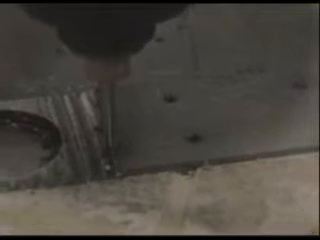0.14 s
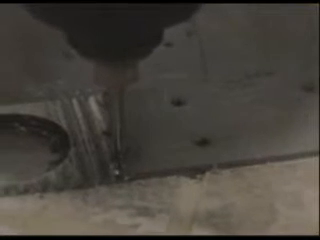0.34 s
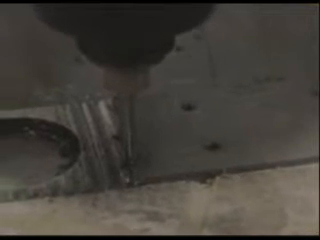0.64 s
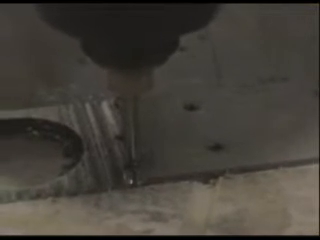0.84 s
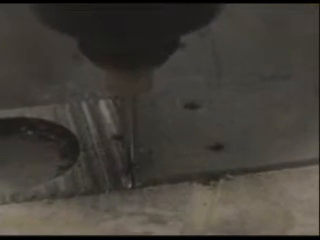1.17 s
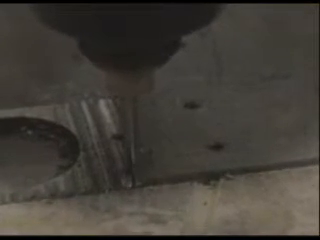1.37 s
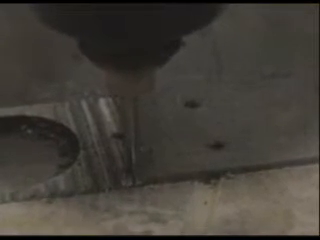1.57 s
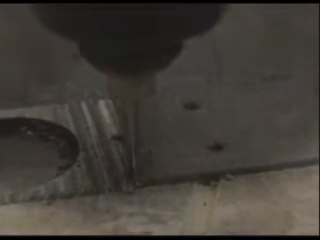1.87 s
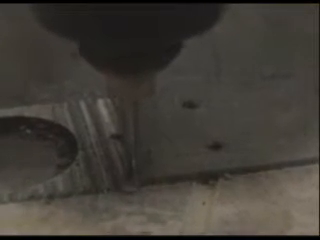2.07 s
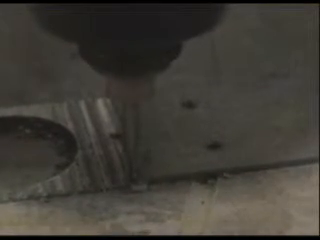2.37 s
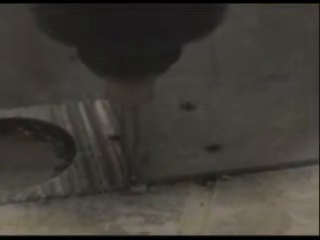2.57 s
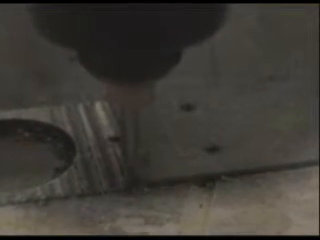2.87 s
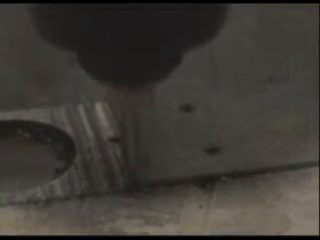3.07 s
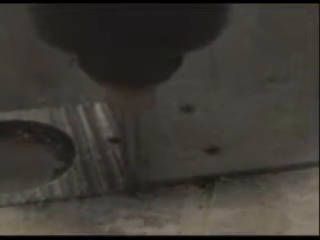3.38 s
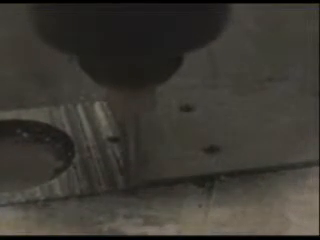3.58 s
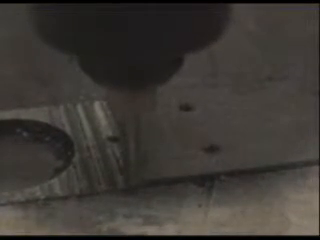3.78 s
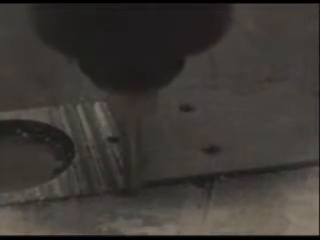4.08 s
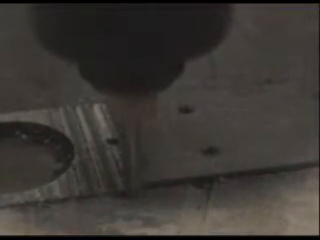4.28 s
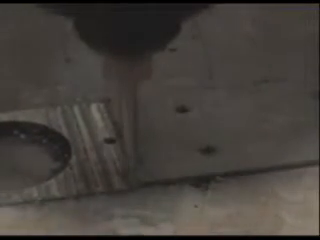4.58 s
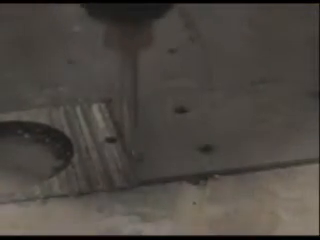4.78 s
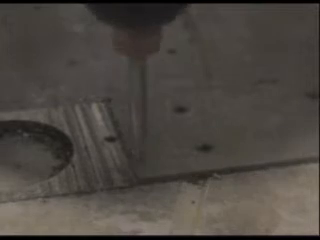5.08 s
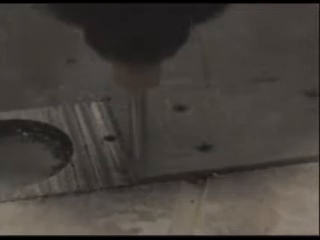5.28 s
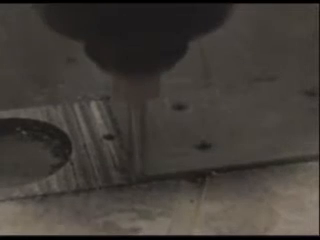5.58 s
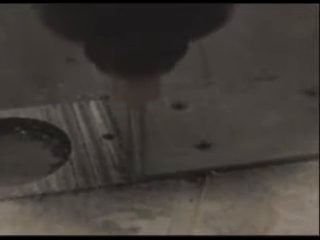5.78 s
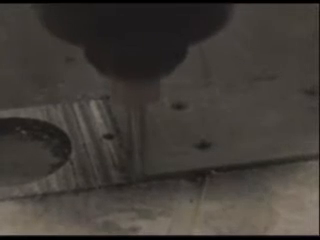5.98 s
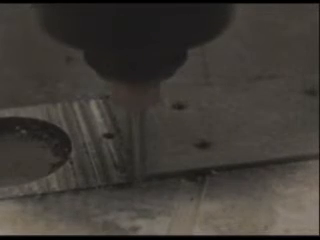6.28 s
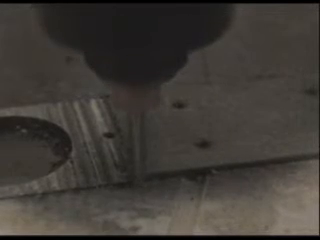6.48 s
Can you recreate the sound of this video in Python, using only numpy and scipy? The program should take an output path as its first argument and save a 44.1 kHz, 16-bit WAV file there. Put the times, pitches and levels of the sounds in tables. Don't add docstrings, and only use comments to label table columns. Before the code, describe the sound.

Harsh milling of steel plate, gritty and ringing, lifts away with knocks and a squeaky chatter, leaving a steady spindle whine and brief axis moves.

```python
import sys
import numpy as np
from scipy import signal
from scipy.fft import rfft, irfft, next_fast_len
from scipy.io import wavfile
from scipy.ndimage import uniform_filter1d

SR = 44100
rng = np.random.default_rng(int(sys.argv[2]) if len(sys.argv) > 2 else 0)


def boost_factor(decibels):
    exponent = np.asarray(decibels, float) / 20
    return 10 ** exponent


def pcm_store(signal):
    levels = np.round(np.clip(np.atleast_2d(signal), -1, 1) * 32767)
    wavfile.write(sys.argv[1], SR, levels.astype(np.int16).T)


N = 292824

# t/s, f/Hz
SHAFT_SPEED = [
    (0, 213.6),
    (.3, 213.2),
    (1.3, 213.45),
    (2.1, 213.1),
    (2.7, 213.4),
    (2.8, 215),
    (3.3, 214.8),
    (3.4, 214.5),
]
# shaft multiple, level/dB
BITE_ORDERS = [(2, -1.5), (3, -18.5), (4, -1), (5, -13.5), (6, 2), (7, -17), (8, -7.5), (9, -13.5), (10, 0),
               (11, -10), (12, -3), (13, -7.5), (14, -15.5), (15, -7.5), (16, -8), (17, -13), (18, -7),
               (19, -21.5), (20, -8)]
# shaft multiple, level/dB
RUB_ORDERS = [(1, -17), (2, -21), (3, -13), (4, -8), (5, -5.5), (6, 0), (7, -13.5), (8, -4.5), (9, -9),
              (10, -14), (11, -13.5), (12, -11), (13, -8), (14, -30), (15, -15)]
BARS_DB = [-18, -19, -7.5, -3.5, -2, -6.5, -14]
# f/Hz, density/dB
FAN_AIR = [(53, -72), (90, -23.5), (209, -18.5), (267, -14), (497, -12.5), (646, -10), (941, -11.5),
           (1110, -6), (1340, -9.5), (2230, -9), (2740, -6.5), (3440, -5), (4150, -3.5), (6270, -7.5),
           (8000, -15.5), (10400, -40.5), (17600, -120)]
# f/Hz, width/Hz, level/dB
HOUSING = [(651, 35, 4.5), (1147, 160, 7), (3040, 310, 1.5), (4106, 170, -2), (4990, 170, -3.5),
           (6420, 200, -5.5)]
# f/Hz, density/dB
TEAR = [(250, -35.5), (480, -29), (570, -1.5), (680, -9.5), (900, -29.5), (1100, -8.5), (1250, 0),
        (1450, -9.5), (2500, -3), (4000, -9), (5600, -9.5), (8000, -10), (10000, -54)]
# f/Hz, width/Hz, level/dB
TOOL_IN = [(4470, 40, -10), (4680, 28, 0), (4890, 30, -7), (5088, 45, -2), (5310, 40, -13), (5510, 45, -10),
           (5720, 60, -13)]
# f/Hz, width/Hz, level/dB
TOOL_OUT = [(4510, 30, -10), (4715, 28, -1), (4935, 20, 2), (5150, 24, -1), (5580, 30, -12)]
# t/s, level/dB
JOLTS = [
    (4.385, -28),
    (5.045, -27),
    (5.263, -24.5),
]
# f/Hz, left minus right/dB
CUT_SIDE = [(60, 0.5), (88, 13), (130, 4.5), (190, -1), (270, -1.5), (400, -4), (590, 8), (860, 2),
            (1260, 7), (1840, 8), (2690, 2.5), (3940, 7), (5760, 4), (8430, -1)]
# f/Hz, left minus right/dB
FAN_SIDE = [(60, 9), (94, -8), (150, 8.5), (230, 2), (360, 5.5), (570, 6.5), (890, 2.5), (1400, 4.5),
            (2190, 3.5), (3430, 5.5), (5380, 3), (8430, 3)]
# f/Hz, level/dB
SCATTER = [(100, -1.5), (250, -7.5), (500, -9.5), (1000, -14), (2000, -25.5), (4200, -14.5), (7800, -9),
           (8500, -21)]
# f/Hz, level/dB
ROLL_OFF = [(100, -12.5), (140, -2.5), (200, 1), (7600, 1), (8000, -3.5), (8370, -10), (8700, -20.5),
            (9000, -50)]
# t/s, level/dB
DEPTH = [(0, -31), (.14, -29.5), (.69, -29), (.9, -30), (1.35, -29), (1.7, -31), (2.2, -30.5),
         (2.64, -28.5), (2.75, -31)]
# t/s, ring level/dB, half length/s
GRABS = [(.065, 1, 0.024), (.12, 1, 0.022), (.17, -2, 0.01), (.29, -2.5, .02), (.41, -1, 0.017),
         (.92, -2.5, 0.043), (1.38, 1.5, 0.054), (1.53, 1.5, .035), (1.62, -3, 0.033), (1.84, 1.5, 0.034),
         (1.965, -7.5, 0.019), (2.03, 3.5, .02), (2.36, 1.5, .015), (2.39, -6, 0.0082), (2.425, 4.5, 0.012),
         (2.54, 0.5, 0.02), (2.58, -10, 0.016), (2.67, -0.5, .03), (2.73, -6, 0.018), (2.79, 3, .015)]
# t/s, level/dB, t60/s
KNOCKS = [
    (2.825, -25, 1.5),
    (3.13, -28.5, 1.5),
    (3.349, -29, .15),
]
# t/s, level/dB, half length/s
SNAGS = [
    (2.855, 0, 0.015),
    (2.97, 1.5, 0.016),
    (3.1, 0.5, .02),
    (3.2, -3.5, 0.01),
    (3.29, -1.5, 0.023),
    (3.35, 8.5, 0.013),
    (3.488, 10, 0.012),
]
# t/s, level/dB
GAIN = [(0, -4.5), (.7, -4.5), (1.7, -6), (2.75, -3.5), (2.9, -7.5), (3.16, -1.5), (3.29, -4.5), (3.7, 0),
        (4.3, 1), (4.45, 0.5), (4.84, 0.8), (4.92, -1), (5.03, 1.5), (5.08, -2.5), (5.22, -0.2),
        (5.34, -0.5), (5.66, 0), (6.64, -0.1)]
# t/s, level/dB, half length/s
THRUM_LIFT = [
    (2.952, 5, 0.34),
]
# t/s, half length/s, f/Hz, level/dB, overtone level/dB
NUDGES = [
    (4.4, 0.05, 162, -46.5, -40),
    (4.636, 0.041, 217, -62.5, -38),
    (4.75, 0.05, 153.6, -53, -47),
    (4.862, .04, 172, -49, -39),
]
# t/s, f/Hz, level/dB, half length/s
SQUEAK = (2.857, 4700, -25, .024)

IDLE_HZ, FEED_HZ = 214.5, 15
LIFT_S, BITE_FADE_DB_S, DULL_DB_S = 2.753, 124, 69
TEAR_DB, RING_DB = -2, 3.5
TEAR_FOLLOWS, BITE_FOLLOWS = 0.66, 0.3
RUB_FROM_S, RUB_TO_S, RUB_DB, RUB_RISE_DB_S, RUB_FALL_DB_S = 2.946, 3.235, -33.5, 60.5, 46
KNOCK_ORDER = 5
CHATTER_S, CHATTER_DB, CHATTER_FADE_DB_S = 2.83, -25.5, 11.5
FREE_S, FREE_DB_S, CUT_ENDS_S = 3.4, 158, 3.8
SING_DB, WANDER = -4, .5
FAN_DB, WHINE_DB, BLADE_DB, THRUM_DB = -33.5, -25.5, -38.5, -46.5
LOAD_WHINE_DB, LOAD_BLADE_DB = -0.5, -6
PLUNGE_S, PLUNGE_HZ, PLUNGE_DB, RAMP_HZ_S, RAMP_DB_S = 5.185, 249, -38.5, 768, 69


def unit(x):
    return x / np.sqrt(np.mean(x ** 2) + 1e-20)


def along(points, hz):
    f, v = np.transpose(points)
    return np.interp(np.log(hz + 1), np.log(f + 1), v)


def curves(rows, off=None):
    s, *cols = np.transpose(rows)
    return [np.interp(np.arange(N) / SR, s, c, right=off) for c in cols]


def wobble(rate, count=N):
    knots = rng.standard_normal(int(N * 400 / SR) + 4)
    return np.interp(np.arange(count) * rate / SR, np.arange(len(knots)), knots)


def after(s):
    return np.maximum(np.arange(N) / SR - s, 0)


def before(s):
    return np.maximum(s - np.arange(N) / SR, 0)


def bumps(rows):
    t = np.arange(0, N + 64, 64) / SR
    swells = sum(height * np.exp(-((t - s) / half) ** 2) for s, height, half in rows)
    return np.interp(np.arange(N) / SR, t, swells)


def filtered(x, response):
    m = next_fast_len(N + 8192)
    return irfft(rfft(x, m) * response(np.fft.rfftfreq(m, 1 / SR)), m)[..., :N]


def modes(table):
    def response(f):
        return sum((-1) ** k * boost_factor(db) * 1j * f * w / (c * c - f * f + 1j * f * w)
                   for k, (c, w, db) in enumerate(table))
    return response


def shaft():
    hz = curves(SHAFT_SPEED, off=IDLE_HZ)[0]
    return 2 * np.pi * np.cumsum(hz + 0.1178 * wobble(12)) / SR


def effort():
    depth_db, grab_db = curves(DEPTH)[0], bumps(GRABS)
    bite_db = depth_db + BITE_FOLLOWS * grab_db - BITE_FADE_DB_S * after(LIFT_S)
    bright_db = -.5 - DULL_DB_S * after(LIFT_S - .08)
    gone_db = depth_db - 800 * after(CHATTER_S)
    free_db = FREE_DB_S * after(FREE_S)
    rub_db = RUB_DB - RUB_RISE_DB_S * before(RUB_FROM_S) - RUB_FALL_DB_S * after(RUB_TO_S)
    rub_db = rub_db - free_db - 300 * before(LIFT_S - .06)
    knock_db = np.max([db - 60 * after(s) / t60 - 400 * before(s) for s, db, t60 in KNOCKS], axis=0) - free_db
    chatter_db = CHATTER_DB - CHATTER_FADE_DB_S * after(CHATTER_S) - 150 * before(CHATTER_S)
    chatter_db = chatter_db + bumps(SNAGS) - 200 * after(FREE_S + 0.13)
    tear_db = np.maximum(gone_db + TEAR_DB + TEAR_FOLLOWS * grab_db, chatter_db - 9)
    ring_db = gone_db + RING_DB + grab_db
    return bite_db, bright_db, rub_db, knock_db, tear_db, ring_db, chatter_db


def orders(table, angle, sway_db, gain):
    n, one = round(CUT_ENDS_S * SR), np.ones(N)
    x = 0
    for k, db in table:
        level = (gain(k) * one)[:n] * boost_factor(db + sway_db * wobble(22.06, count=n))
        x = x + level * np.sin(k * angle[:n] + 2 * np.pi * rng.random())
    return np.pad(x, (0, N - n))


def bite_tones(angle, bite_db, bright_db):
    feed = 2 * np.pi * np.cumsum(FEED_HZ + 0.33 * wobble(2.4)) / SR
    throb = 1 + .33 * np.cos(feed) + .17 * np.cos(2 * feed + 1) + .17 * np.cos(4 * feed + 2)

    def gain(k):
        return throb if k == 6 else boost_factor(bright_db) if k > 9 else 1
    tones = boost_factor(bite_db + 3.5) * orders(BITE_ORDERS, angle, sway_db=1.4, gain=gain)
    return tones * (1 + 0.068 * np.cos(4 * feed))


def strikes(gate, steady):
    return gate * (steady + rng.standard_normal(N)) * boost_factor(0.37 * wobble(120))


def chips(gate, tear_db):
    return boost_factor(tear_db + 4.0) * unit(filtered(strikes(gate, .0), lambda f: boost_factor(along(TEAR, f))))


def sing(table):
    n = round(CUT_ENDS_S * SR)
    drift = 2 * np.pi * np.cumsum(WANDER * wobble(45, count=n)) / SR
    t = np.arange(n) / SR
    x = sum(boost_factor(db + 1.8 * wobble(45, count=n)) * np.sin(2 * np.pi * hz * t + width * drift)
            for hz, width, db in table)
    return np.pad(unit(x), (0, N - n))


def tool_ring(contact, level_db, table, sing_db):
    return boost_factor(level_db) * (unit(filtered(contact, modes(table))) + boost_factor(sing_db) * sing(table))


def shank_hash(contact, ring_db, chatter_db):
    return boost_factor(np.maximum(ring_db, chatter_db) - 8) * unit(filtered(contact, modes([(4970, 360, 0)])))


def fan_air(gain_db):
    z = signal.stft(rng.standard_normal(N), nperseg=512)[2]
    patches = uniform_filter1d(uniform_filter1d(rng.standard_normal(z.shape), 6, 0), 8, 1)
    air = signal.istft(z * boost_factor(0.64 * unit(patches)), nperseg=512)[1][:N]

    def housing(f):
        return boost_factor(along(FAN_AIR, f)) * (1 + sum(np.abs(modes([m])(f)) for m in HOUSING))
    return boost_factor(FAN_DB + gain_db + 13 + 0.23 * wobble(25)) * unit(filtered(air, housing))


def commutator_whine(angle, gain_db, load):
    bars_db = WHINE_DB + 1.18 * gain_db + load * (LOAD_WHINE_DB + 1.6 * wobble(12))
    bars_db = bars_db + 0.54 * wobble(8.7) + 1.4 * wobble(32)
    mains = 2 * np.pi * 120 * np.arange(N) / SR
    slip = 12 * angle + 0.12 * wobble(30)
    bars = sum(boost_factor(db + 0.24 * wobble(30)) * np.sin(slip + (k - 2) * mains) for k, db in enumerate(BARS_DB))
    upper = boost_factor(-13.0 + 2.5 * wobble(22)) * np.sin(24 * angle + 2 * mains - angle / 7.9)
    return boost_factor(bars_db) * (bars + upper)


def blade_tone(angle, gain_db, load):
    blade_db = BLADE_DB + 1.6 * gain_db + load * (LOAD_BLADE_DB + 3 * wobble(12))
    jerk = 1.3 * wobble(70) * (np.arange(N) / SR < 2.73)
    return boost_factor(blade_db + 3.5 + 0.59 * wobble(30)) * np.sin(39 * angle + jerk)


def shaft_thrum(angle):
    thrum_db = THRUM_DB + bumps(THRUM_LIFT) + 0.5 * after(FREE_S)
    return boost_factor(thrum_db + 1.1 * wobble(18)) * np.sin(angle + np.array([[.45], [-.45]]))


def rub_tones(angle, rub_db):
    return boost_factor(rub_db + 9.0) * orders(RUB_ORDERS[1:], angle, sway_db=2.5, gain=lambda k: k != KNOCK_ORDER)


def edge_knocks(angle, knock_db):
    return boost_factor(knock_db + 3.0) * np.sin(KNOCK_ORDER * angle)


def tip_squeak():
    s, hz, db, half = SQUEAK
    t = np.arange(N) / SR - s
    swell = boost_factor(db + 1.5 * wobble(80)) * np.exp(-(t / half) ** 4)
    return swell * np.sin(2 * np.pi * hz * t + .4 * wobble(120))


def carriage_jolts():
    jolt = bumps([(s, boost_factor(db + 4.0), 0.016) for s, db in JOLTS])
    frame = modes([(330, 72, -8.0), (605, 310, 1.0), (1320, 710, 4.5), (4200, 2600, -7)])
    return jolt * unit(filtered(rng.standard_normal(N), frame))


def lift_motor():
    t = np.arange(N) / SR
    hum = 0
    for s, half, hz, db, over_db in NUDGES:
        turn = 2 * np.pi * hz * t
        hum = hum + np.exp(-((t - s) / half) ** 4) * (boost_factor(db) * np.sin(turn) + boost_factor(over_db) * np.sin(2 * turn))
    away = np.abs(t - PLUNGE_S)
    angle = 2 * np.pi * np.cumsum(np.maximum(PLUNGE_HZ - RAMP_HZ_S * away, 130)) / SR
    plunge_db = PLUNGE_DB - RAMP_DB_S * away - 400 * np.maximum(away - .16, 0)
    return hum + boost_factor(plunge_db) * (np.sin(angle) + boost_factor(-15) * np.sin(2 * angle))


def cutter(angle):
    bite_db, bright_db, rub_db, knock_db, tear_db, ring_db, chatter_db = effort()
    angle = angle + 0.034 * wobble(150)
    tones = bite_tones(angle, bite_db, bright_db) + rub_tones(angle, rub_db) + edge_knocks(angle, knock_db)
    gate = np.exp(.65 * np.cos(2 * angle) + .22 * np.cos(angle + 1))
    contact = np.diff(strikes(gate ** 3, .3), prepend=0)
    noises = chips(gate, tear_db) + tool_ring(contact, ring_db - 1.0, TOOL_IN, SING_DB)
    noises += tool_ring(contact, chatter_db - 0.7, TOOL_OUT, SING_DB - 4.5)
    noises += shank_hash(contact, ring_db, chatter_db) + tip_squeak()
    return tones, noises


def motor(angle):
    gain_db = curves(GAIN)[0]
    load = np.clip(before(FREE_S + .2) / 0.52, 0, 1)
    tones = commutator_whine(angle, gain_db, load) + blade_tone(angle, gain_db, load)
    return tones, fan_air(gain_db) + carriage_jolts() + lift_motor()


def heard(tones, x, side):
    z = signal.stft(x, nperseg=1024)[2]
    scatter = signal.istft(z * np.exp(2j * np.pi * rng.random(z.shape)), nperseg=1024)[1][:N]
    scatter = unit(scatter) * np.std(x) * np.array([[1], [-1]])
    both = tones + x + filtered(scatter, lambda f: boost_factor(along(SCATTER, f)))
    return filtered(both, lambda f: boost_factor(np.outer([.4, -.6], along(side, f))))


def scene():
    angle = shaft()
    return heard(*cutter(angle), CUT_SIDE) + heard(*motor(angle), FAN_SIDE) + shaft_thrum(angle)


def low_pass(x):
    return signal.sosfilt(signal.butter(12, 9030, fs=SR, output="sos"), x)


def record(dry):
    dry = dry * boost_factor(0.23 * wobble(18))
    dry = dry / (1 + np.abs(dry / .9) ** 3) ** (1 / 3)
    folded = dry * (1 + 2 * np.cos(2 * np.pi * 16000 * np.arange(N) / SR))
    kicks = (rng.random(N) < 30 / SR) * rng.standard_normal(N)
    kicks[[round(s * SR) for s, db in JOLTS]] = 3.5
    thumps = boost_factor(-63.5) * unit(filtered(kicks, lambda f: 1 / (1 + 1j * f / 40) ** 2))
    mix = thumps + filtered(folded, lambda f: boost_factor(along(ROLL_OFF, f)) * (f < 9050))
    return low_pass(mix)


dry = scene()
out = record(dry)
pcm_store(out)
```